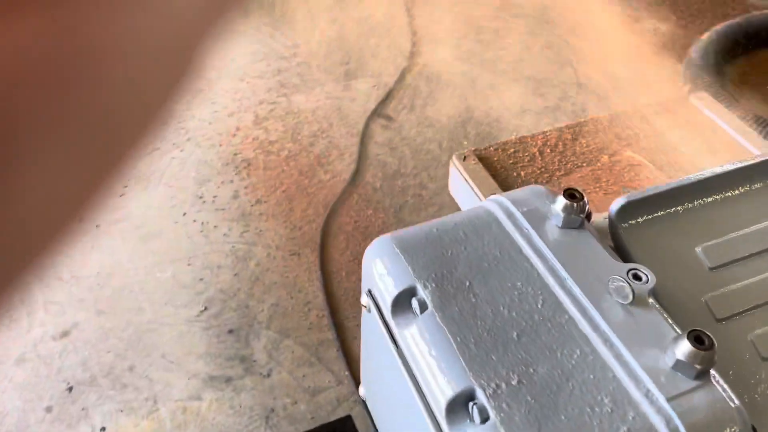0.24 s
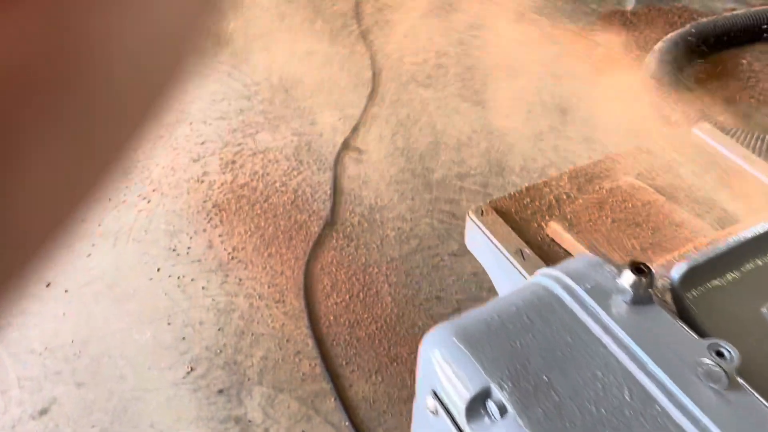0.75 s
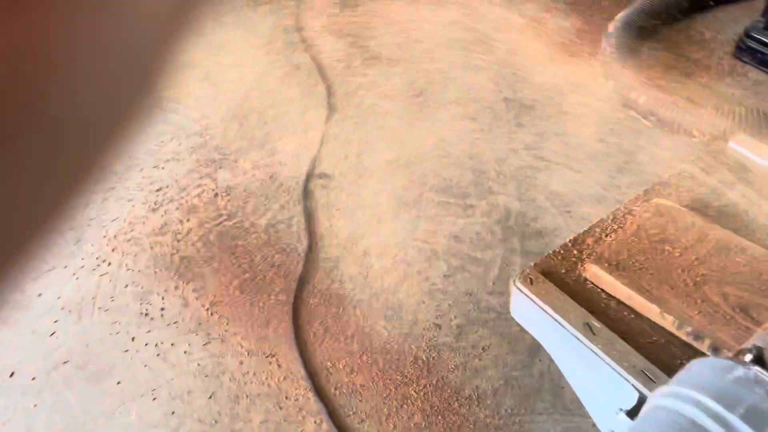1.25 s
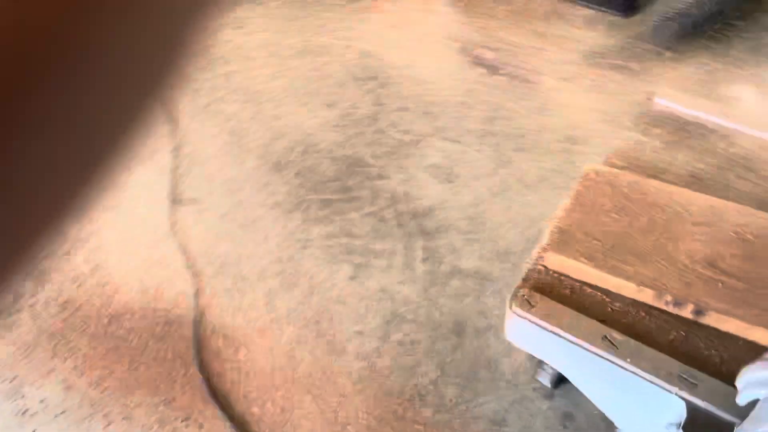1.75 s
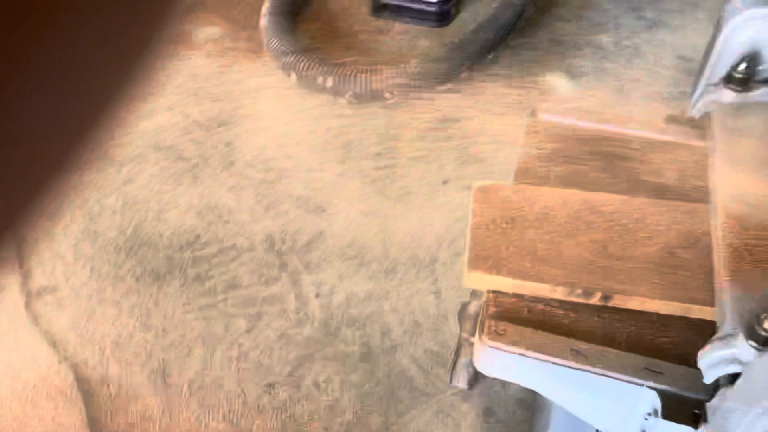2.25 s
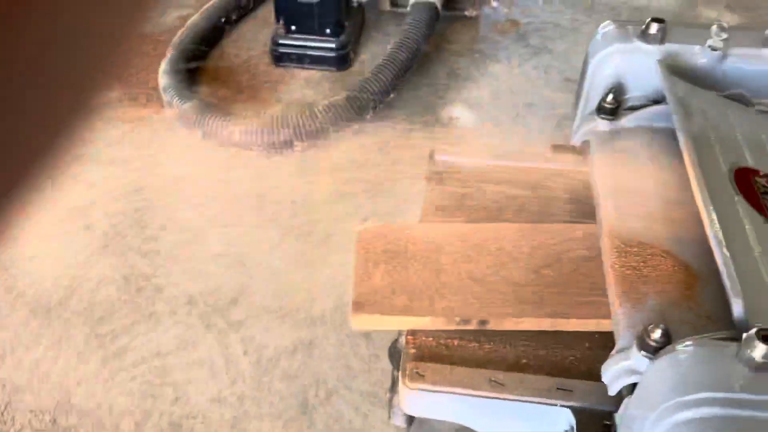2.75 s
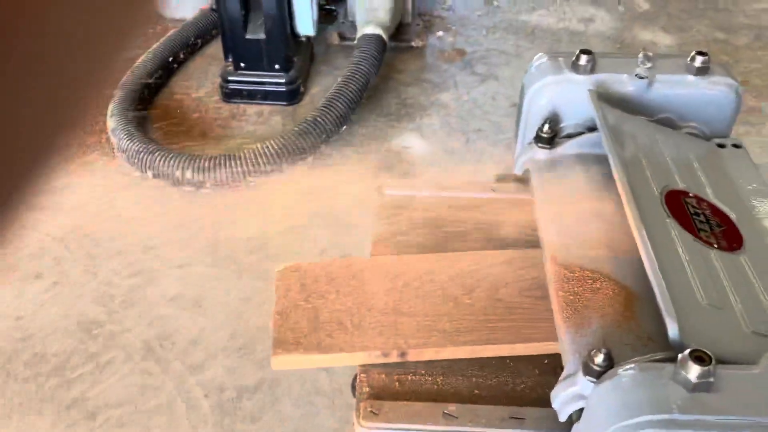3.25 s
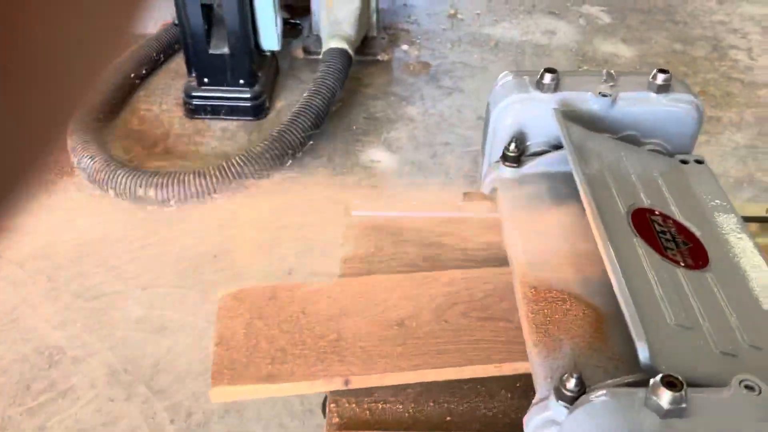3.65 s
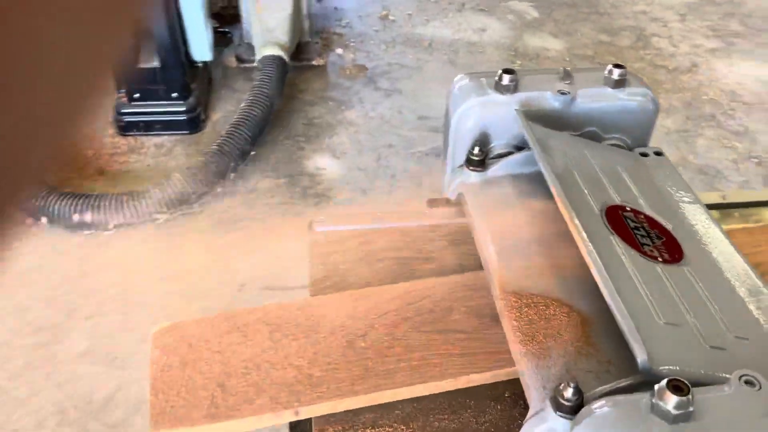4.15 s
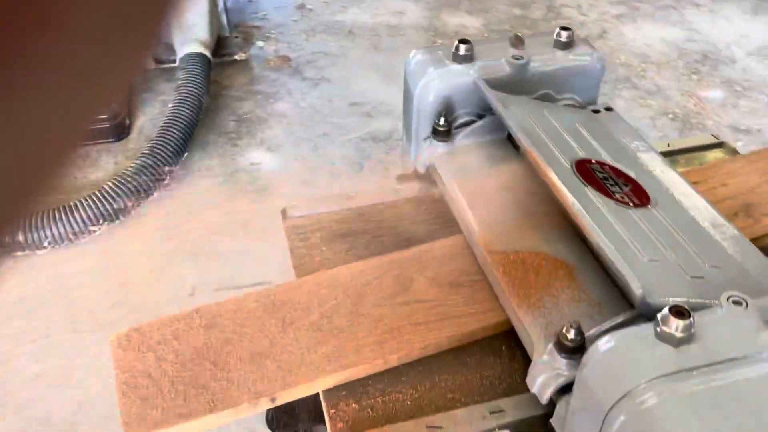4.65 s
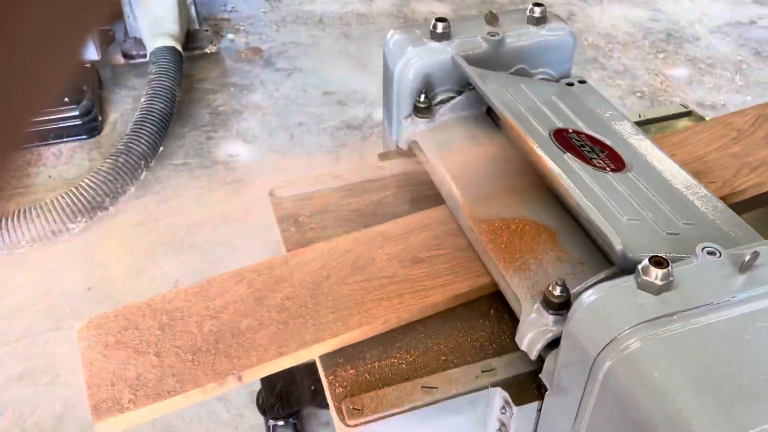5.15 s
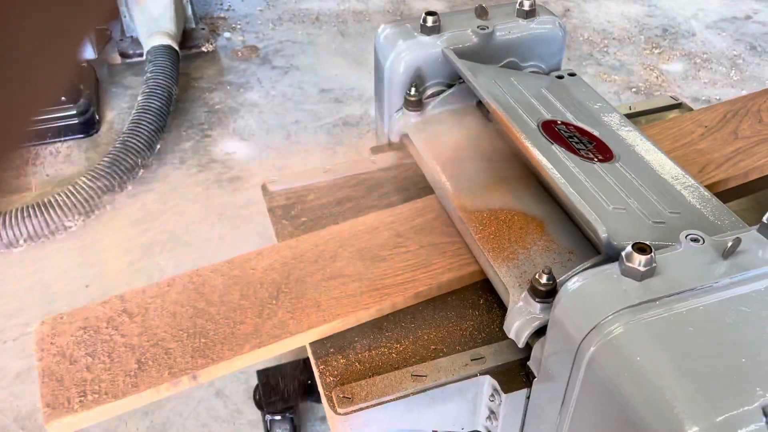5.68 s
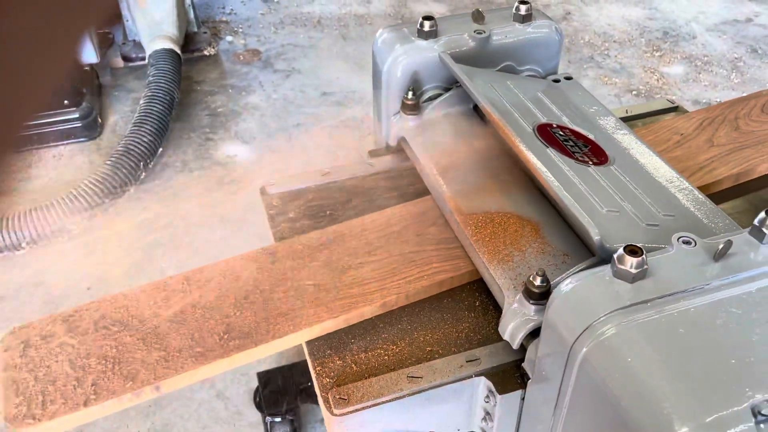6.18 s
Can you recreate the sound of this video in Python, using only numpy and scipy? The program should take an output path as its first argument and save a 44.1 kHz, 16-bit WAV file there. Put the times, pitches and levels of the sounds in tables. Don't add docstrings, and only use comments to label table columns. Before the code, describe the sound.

A thickness planer runs close by, its steady motor hum under a buzzing metallic whir and gritty hiss of wood being shaved.

```python
import sys
import numpy as np
from scipy import signal
from scipy.fft import rfft, irfft, next_fast_len
from scipy.io import wavfile
from scipy.ndimage import map_coordinates

SR = 44100
rng = np.random.default_rng(int(sys.argv[2]) if len(sys.argv) > 2 else 0)


def volts_from_db(level):
    exponent = np.asarray(level, float) / 20
    return 10 ** exponent


def transcribe(signal):
    frames = np.atleast_2d(signal).T
    limited = np.clip(frames, -1, 1)
    pcm = np.round(limited * 32767).astype(np.int16)
    wavfile.write(sys.argv[1], SR, pcm)


N = 283122
TIME = np.arange(N) / SR
SIZE = next_fast_len(N + 4096)
FREQ = np.maximum(np.arange(SIZE // 2 + 1) * SR / SIZE, 1)
HEAD_HZ = 68.025
# low_ring_db, high_ring_db, tearing_db, turn_to_turn_spread_db
KNIFE_SET = [
    (-6.5, 0, 0, 4.2),
    (0, -2.5, -6, 2.5),
    (-7.5, -24, -16, 2.2),
]
# pitch_hz, width_hz, level_db
HOOD_MODES = [(1190, 250, 7.5), (1666, 168, 4), (2335, 175, 9.5), (3284, 320, -6.5)]
# start_s, nearness_db, facing_outfeed_db, table_echo_ms
WALK_PATH = [(0.0, -1.4, -13, 0.815), (0.54, -2.0, -8.5, 0.73), (1.07, -2.5, -7.5, 0.62),
             (1.6, -0.9, -3, 0.68), (2.14, 0.5, 2.2, 0.64), (2.68, 1, 0.9, 0.7), (3.21, 3, -3.2, 0.72),
             (3.74, 2.5, -0.2, 0.64), (4.28, 1.5, 2.5, 0.565), (4.82, 2, 3, 0.44), (5.35, 1.5, 3, 0.43),
             (5.89, 1.5, 3.5, 0.41), (6.42, 2, 2, 0.43)]


def in_time(rows, t=TIME):
    s, *columns = np.transpose(rows)
    return [np.interp(t, s, c) for c in columns]


def at_hz(points, hz):
    f, *columns = np.transpose(points)
    return [np.interp(np.log(hz), np.log(f), c) for c in columns]


def rms_one(x):
    return x / np.sqrt(np.mean(x ** 2) + 1e-20)


def colour(x, spectrum):
    gain = volts_from_db(at_hz(spectrum, FREQ)[0])
    return rms_one(irfft(rfft(x, SIZE) * gain, SIZE)[..., :N])


def drift(shape, per_s, steps_per_s):
    r = np.exp(-2 * np.pi * per_s / steps_per_s)
    white = rng.standard_normal(shape[:-1] + (shape[-1] + 400,))
    slow = signal.lfilter([1], [1, -2 * r, r * r], white)[..., 400:]
    return slow * np.sqrt((1 - r * r) ** 3 / (1 + r * r))


def bell(x, centre, half):
    return np.exp(-((x - centre) / half) ** 2)


def resonance(hz, width):
    r = np.exp(-np.pi * width / SR)
    return (1 - r * r) / 2 * np.array([1, 0, -1]), [1, -2 * r * np.cos(2 * np.pi * hz / SR), r * r]


def seen_from_walk(hz, s):
    # centre_s, half_length_s, pitch_hz, half_width_hz, level_db
    spots = [(0.303, 0.47, 2580, 79, 14), (0.376, 1.1, 1259, 60.0, 14), (0.39, 1.14, 2380, 70.4, -9.5),
             (0.664, 1.44, 2299, 50.0, 14.5), (0.81, 0.27, 1580, 60.7, -11), (0.832, 8.6, 1680, 49.3, 5.5),
             (1.25, 1.9, 1506, 38.5, 1.5), (1.6, 0.45, 2500, 68.6, 11), (2.187, 0.96, 3080, 233, -16.8),
             (2.53, 0.69, 1503, 39.8, -13), (2.646, 0.37, 2440, 70.0, -9), (3.27, 1.8, 3190, 70.0, 12),
             (4.32, 0.29, 2600.0, 50.3, 18), (4.392, 0.8, 1056, 110.0, 14.5),
             (4.924, 0.75, 1299, 64.4, 16.5), (5.97, 0.36, 1002, 49.7, -10), (6.19, 0.56, 1180, 142, 10),
             (6.34, 2.08, 2770, 100.0, 7.5)]
    # centre_s, half_length_s, pitch_hz, half_width_hz, level_db
    more_spots = [(.8, 1.5, 620, 35, 20), (1.5, 1.1, 894, 30, 5.5), (3.1, .6, 816, 43, 8.5),
                  (5.2, 0.65, 700, 40, 4), (5.1, 1.1, 777, 50, 7.5), (4.6, 0.36, 612, 45, 11),
                  (5.49, 0.41, 3290, 90, 9), (1.15, .5, 1090, 50, 7.5), (4.7, .6, 556, 40, 17),
                  (.7, 0.36, 2800, 400, -4.5), (1.43, .25, 2210, 130, -9.5), (4.07, 0.37, 2250, 120, -6)]
    near_db, facing_db, echo_ms = in_time(WALK_PATH, s)
    echo = abs(1 + 0.37 * np.exp(-2j * np.pi * hz * echo_ms / 1000))
    octaves = np.log2(np.clip(hz, 300, 4200) / 1633)
    db = near_db + 0.22 * facing_db * octaves + 20 * np.log10(echo)
    for at_s, half_s, mode_hz, half_hz, mode_db in [*spots, *more_spots]:
        db = db + mode_db * bell(s, at_s, half_s) * bell(hz, mode_hz, half_hz)
    return db * np.clip((hz - 340) / 544, 0, 1)


def cutterhead_angle():
    # start_s, lag_turns
    path_lag = [(0.0, .249), (1.07, .226), (1.6, .194), (4.5, .18), (6.42, .193)]
    wobble_turns, wobble_s, wobble_ahead_s = .006, .87, 5.05
    wobble = wobble_turns * np.cos(2 * np.pi * (TIME - wobble_ahead_s) / wobble_s)
    return HEAD_HZ * TIME - in_time(path_lag)[0] + wobble


def blows(angle):
    # start_s, above_usual_db
    tear_outs = [(1.87, 4), (2.149, 8), (3.222, 7), (3.399, 4), (3.737, 7), (3.942, 5.5), (4.109, 6),
                 (4.236, 6), (4.369, 7.5), (4.457, 12), (4.548, 10), (5.265, 5), (5.28, 3.5), (5.594, 6)]
    turns = np.arange(np.floor(angle[0]), angle[-1])[:, None] + np.arange(3) / 3
    at = np.interp(turns, angle, np.arange(N), left=N, right=N).astype(int)
    extra_db = np.clip(rng.standard_normal(at.shape), -2.5, 1.5) * np.array(KNIFE_SET)[:, 3]
    for s, db in tear_outs:
        extra_db.flat[np.argmin(abs(at - s * SR))] = db
    return at, extra_db


def train(at, sizes):
    return np.bincount(at.ravel(), sizes.ravel(), N + 1)[:N]


def order_levels(order):
    # multiple_of_head_speed, level_db
    strong_orders = [(3.0, -50), (4.0, -57.5), (6.0, -45.5), (7.0, -45.5), (9.0, -52), (11.0, -49.5),
                     (12.0, -47.5), (13.0, -47.5), (14.0, -52), (15.0, -45), (16.0, -45.5), (17.0, -51.5),
                     (18.0, -42.5), (19.0, -46), (21.0, -37), (22.0, -45), (23.0, -42.5), (24.0, -36),
                     (27.0, -41), (29.0, -43), (30.0, -39.5), (32.0, -55.5), (33.0, -34.5), (35.0, -38),
                     (36.0, -37), (37.0, -42), (39.0, -44.5), (40.0, -52.5), (47.0, -53), (48.0, -46.5)]
    # pitch_hz, level_db
    weak_orders = [(68.0, -77), (680.0, -56.5), (1360.0, -53.5), (1800.0, -48.5), (2500.0, -59),
                   (2900.0, -48), (4200.0, -70)]
    level_db = at_hz(weak_orders, order * HEAD_HZ)[0]
    level_db = level_db + 3.9 * (order > 48) * rng.standard_normal(len(order))
    strong, strong_db = np.transpose(strong_orders)
    level_db[np.round(strong).astype(int) - 1] = strong_db
    return level_db


def order_phases(order, delay_turns, scatter):
    hz = order * HEAD_HZ
    knives = np.array(KNIFE_SET)
    high = np.clip((hz - 1500) / 900, 0, 1)[:, None]
    knife_db = knives[:, 0] * (1 - high) + knives[:, 1] * high
    bed = 1 + np.outer(np.exp(-2j * np.pi * hz * .002), [.85, .25, 0])
    strikes = np.exp(-2j * np.pi * np.outer(order, np.arange(3)) / 3)
    timing = np.angle(np.sum(volts_from_db(knife_db) * bed * strikes, axis=1))
    hood = 0
    for k, (mode_hz, width, db) in enumerate(HOOD_MODES):
        response = signal.freqz(*resonance(mode_hz, width), hz, fs=SR)[1]
        hood = hood + (-1) ** k * volts_from_db(db) * response
    loose = scatter + np.clip((19 - order) / 5, 0, 2) + .6 * (order > 50)
    phase = timing + np.angle(hood) - 2 * np.pi * order * delay_turns
    phase = phase + loose * rng.standard_normal((2, len(order)))
    phase[1] -= 2 * np.pi * hz * .0011
    return phase


def head_tone(angle, delay_turns, scatter, wander, flutter):
    order = np.arange(1, 106)
    level_db = order_levels(order)
    phase = order_phases(order, delay_turns, scatter)
    turns = np.arange(np.floor(angle[0]), angle[-1] + 2)
    when = np.interp(turns, angle, TIME)
    roomy = (np.clip(wander * (order - 5) / 8, 0, wander) * (order % 6 > 0))[:, None]
    shape = (2, 2, len(order), len(turns))
    slow = drift(shape, 0.37, HEAD_HZ) * roomy + rng.standard_normal(shape) * flutter
    gain = (1 + slow[0] + 1j * slow[1]) / np.sqrt(1 + 2 * roomy ** 2)
    seen_db = level_db[:, None] + seen_from_walk(order[:, None] * HEAD_HZ, when)
    lines = volts_from_db(seen_db) * gain * np.exp(1j * phase)[..., None]
    lines = np.pad(lines, ((0, 0), (1, 0), (0, 0)))
    cycles = irfft(lines, 1024, axis=1) * 512 * np.sqrt(2)
    cycles = np.concatenate([cycles, cycles[:, :1]], axis=1)
    place = [angle % 1 * 1024, angle - turns[0]]
    return np.array([map_coordinates(c, place, order=1) for c in cycles])


def uneven_blows(at, extra_db, level_db):
    ring_levels = [-44, -36, -43, -46]
    sizes = (volts_from_db(extra_db) - 1) * volts_from_db(np.minimum(extra_db - 9, 0))
    clicks = train(at, sizes * volts_from_db(np.array(KNIFE_SET)[:, 1])) + 1e-18
    out = 0
    for k, ((hz, width, db), ring_db) in enumerate(zip(HOOD_MODES, ring_levels)):
        ring = signal.lfilter(*resonance(hz, width), clicks)
        out = out + (-1) ** k * volts_from_db(ring_db + db + level_db) * rms_one(ring)
    return volts_from_db(in_time(WALK_PATH)[0]) * out


def tearing(at, extra_db, spectrum, rise_s, fall_s, depth):
    burst = train(at, volts_from_db(np.array(KNIFE_SET)[:, 2] + depth * extra_db))
    for s in (rise_s, fall_s):
        r = np.exp(-1 / (s * SR))
        burst = signal.lfilter([1 - r], [1, -r], burst)
    return colour(burst * rng.standard_normal((2, N)), spectrum)


def coarse_tearing(at, extra_db):
    # pitch_hz, level_db (per Hz)
    crunch = [(500, -80), (1000, -5.5), (2500, 5), (4000, -10.5), (5500, -3.5), (7500, -10.5), (9000, -30),
              (16000, -68)]
    return volts_from_db(-39.5) * tearing(at, extra_db, crunch, rise_s=.0011, fall_s=.0026, depth=.54)


def fine_tearing(at, extra_db):
    # pitch_hz, level_db (per Hz)
    spit = [(3000, -42), (7000, 0), (8500, 2), (11000, -2.5), (14500, -3), (16000, -4.5)]
    level_db = -37.5 + in_time(WALK_PATH)[1]
    return volts_from_db(level_db) * tearing(at, extra_db, spit, rise_s=.0002, fall_s=.0014, depth=1.05)


def rush(level_db, patchy_db):
    # pitch_hz, level_db (per Hz)
    wash = [(20, -48), (60, -13), (110, -14), (250, -5.5), (550, -8), (1000, -2.5), (1600, -3.5),
            (2500, -0.5), (3600, -6.5), (5000, -17.5), (7000, -13), (9000, -14), (12000, -18.5),
            (16000, -14)]
    patches = np.interp(TIME, np.arange(700) / 100, drift((700,), 8.0, 100))
    return volts_from_db(level_db + patchy_db * patches) * colour(rng.standard_normal((2, N)), wash)


def passing_chute(s):
    return bell(s, 1.53, .8)


def along_walk(x, follow):
    hz, s, cells = signal.stft(x, SR, nperseg=1024)
    hz = hz[:, None]
    db = seen_from_walk(hz, s) * np.clip((5200 - hz) / 1500, 0, 1)
    hiss = passing_chute(s) * bell(hz, 5960 + 1400 * (s - 1.53), 1500)
    return signal.istft(cells * volts_from_db(follow * db + 6.0 * hiss), SR, nperseg=1024)[1][:, :N]


def motor():
    # pitch_hz, level_db
    drive_lines = [(58, -65.5), (73, -62), (125.5, -56.5), (161, -57), (166, -68), (242, -59.5), (292, -72)]
    hum_hz, hum_db, facing_share = 120.027, -31.5, 0.15
    out = volts_from_db(hum_db + facing_share * in_time(WALK_PATH)[1]) * np.sin(2 * np.pi * hum_hz * TIME)
    for hz, db in drive_lines:
        waver = np.interp(TIME, np.arange(70) / 10, drift((70,), .8, 10))
        out = out + volts_from_db(db + 0.97 * waver) * np.sin(2 * np.pi * hz * TIME + 2.8 * waver)
    return np.sqrt(2) * np.array([out, 0 * out])


def handling():
    # pitch_hz, level_db (per Hz)
    rumble = [(15, -17), (35, -1), (55, -8), (90, -45)]
    # centre_s, half_length_s, level_db
    grip_shifts = [(1.386, 0.11, 11), (2.098, .15, 7), (4.496, .25, 8), (5.146, .3, 8), (5.85, .3, 8)]
    grip_db, wander_db = -73, 4
    db = grip_db + wander_db * np.interp(TIME, np.arange(140) / 20, drift((140,), 3, 20))
    for s, half_s, shift_db in grip_shifts:
        db = db + shift_db * bell(TIME, s, half_s)
    return volts_from_db(db) * colour(rng.standard_normal((2, N)), rumble)


def ports(pair):
    # pitch_hz, left_over_right_db, right_lead_radians, likeness (0-1)
    port_curve = [(30, 0, 0, .5), (48, 0, 0, .65), (70, -1, .1, .99), (200, -.7, .1, .97),
                  (450, 1, -.2, .82), (800, 0, 0, .62), (1400, 3.5, .5, .78), (2400, 4.2, .1, .85),
                  (3800, 1, .3, .55), (4700, 1.5, -.9, .4), (5700, 3, -3.4, .25), (6600, 3.5, -3.6, .2),
                  (7800, .3, -3.4, .88), (8400, 0, -3.2, .94), (9400, 0, -2.85, .9), (10300, 0, -2.1, .73),
                  (12300, 0, -.3, .88), (16000, 0, .1, .94)]
    lean_db, lead, alike = at_hz(port_curve, FREQ)
    alike = np.clip(alike, 0, 1)
    same, other = rfft(pair, SIZE)
    right = alike * np.exp(1j * lead) * same + np.sqrt(1 - alike ** 2) * other
    both = np.array([same * volts_from_db(lean_db / 2), right * volts_from_db(-lean_db / 2)])
    return irfft(both, SIZE)[:, :N]


def scene():
    angle = cutterhead_angle()
    at, extra_db = blows(angle)
    machine = volts_from_db(1.2) * head_tone(angle, delay_turns=.008, scatter=.2, wander=.17, flutter=.06)
    machine = machine + uneven_blows(at, extra_db, level_db=-21)
    machine = machine + fine_tearing(at, extra_db)
    noise = coarse_tearing(at, extra_db) + rush(level_db=-37, patchy_db=2.4)
    machine = machine + along_walk(noise, follow=0.62)
    machine = machine + motor() + handling()
    chute = passing_chute(TIME)
    turn = volts_from_db(0.4 * (chute - np.mean(chute)) / 2)
    return ports(machine) * [turn, 1 / turn]


def band_limit(x):
    return signal.sosfilt(signal.butter(12, 16000, fs=SR, output="sos"), x)


def record(dry):
    low_pass = signal.cheby2(12, 40, 16200, fs=SR, output="sos")
    mix = signal.sosfilt(low_pass, dry)
    return band_limit(mix)


dry = scene()
out = record(dry)
transcribe(out)
```